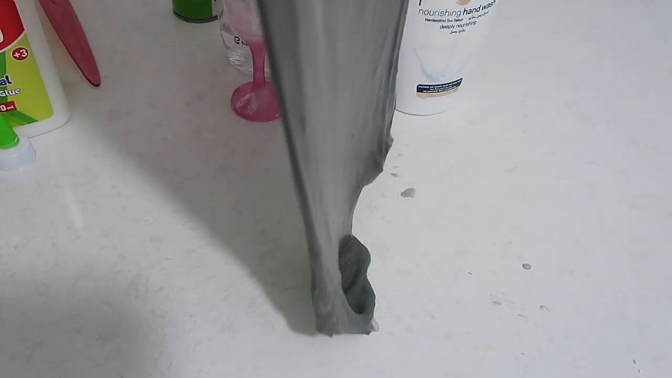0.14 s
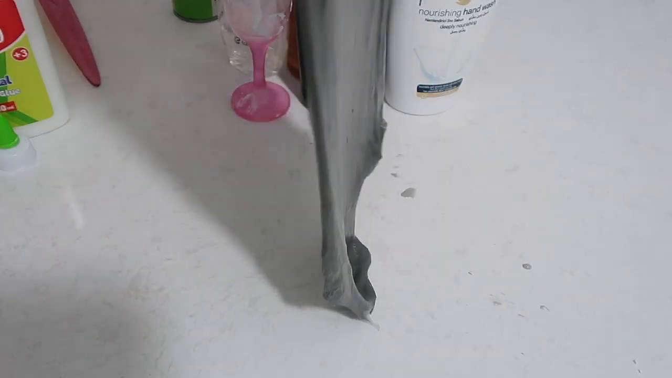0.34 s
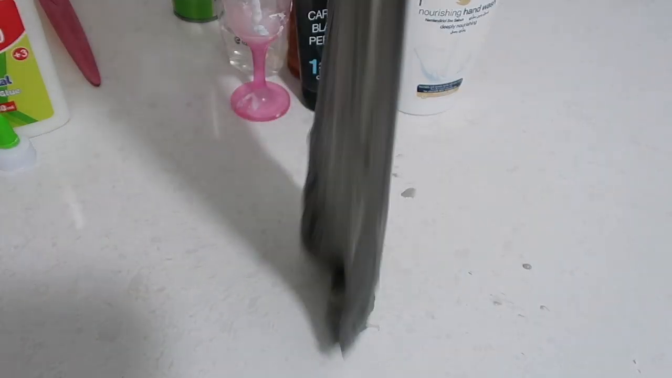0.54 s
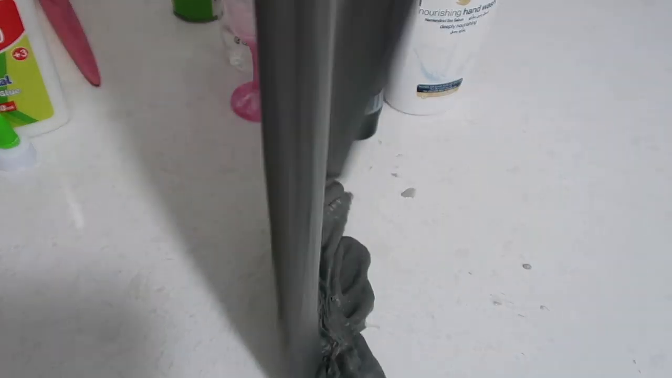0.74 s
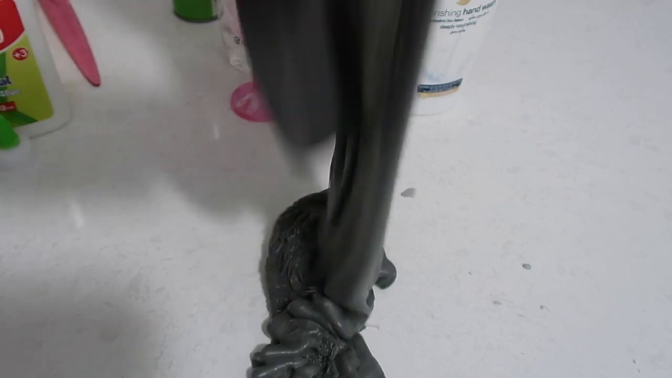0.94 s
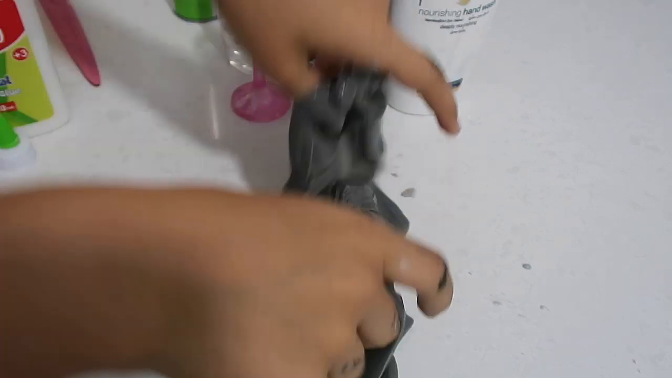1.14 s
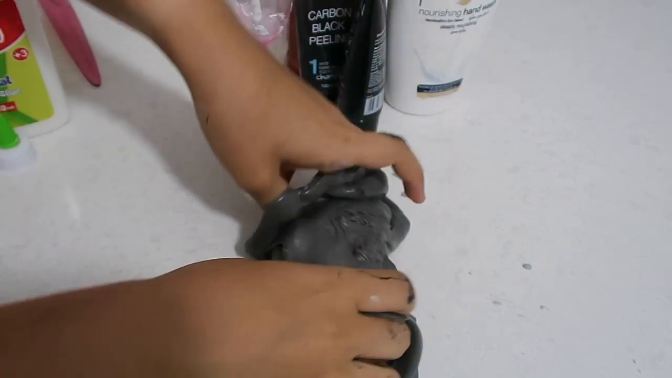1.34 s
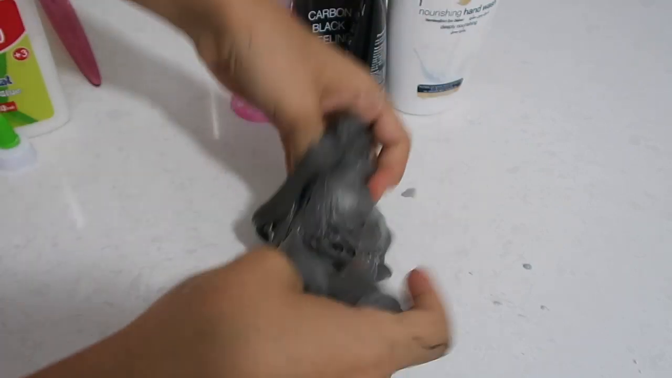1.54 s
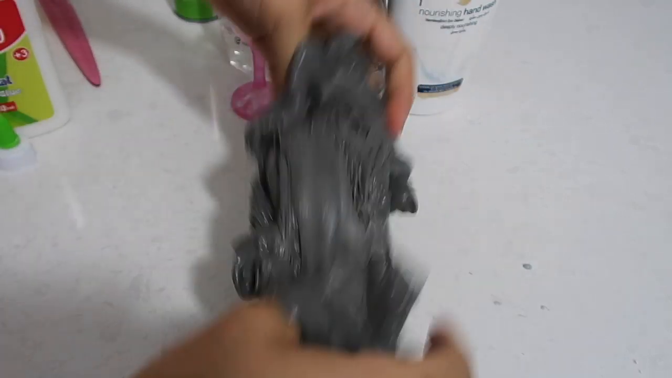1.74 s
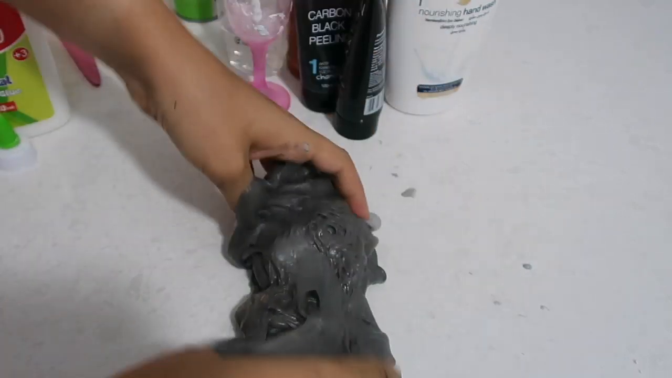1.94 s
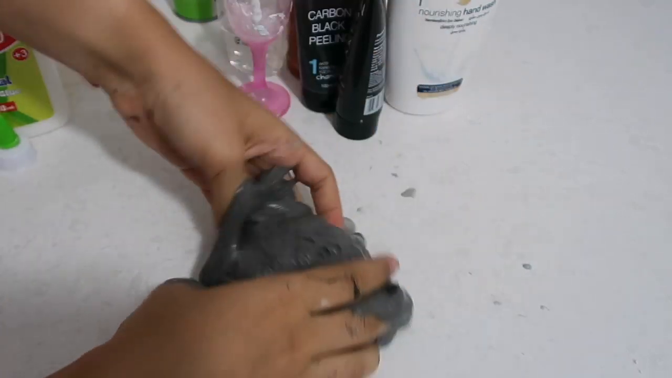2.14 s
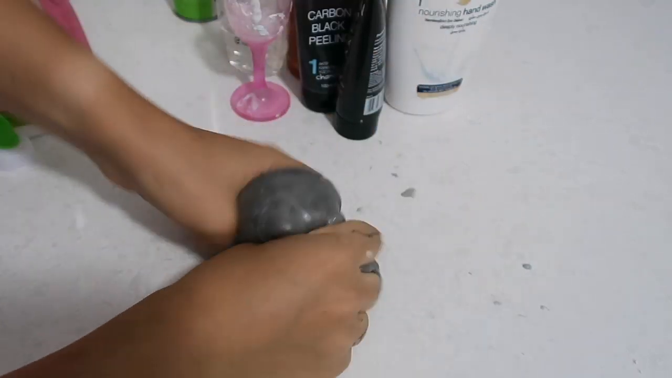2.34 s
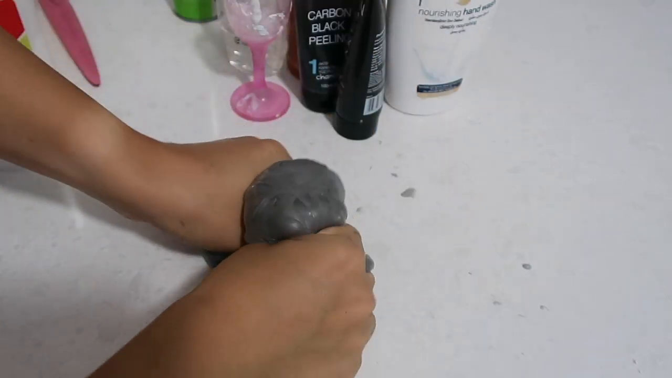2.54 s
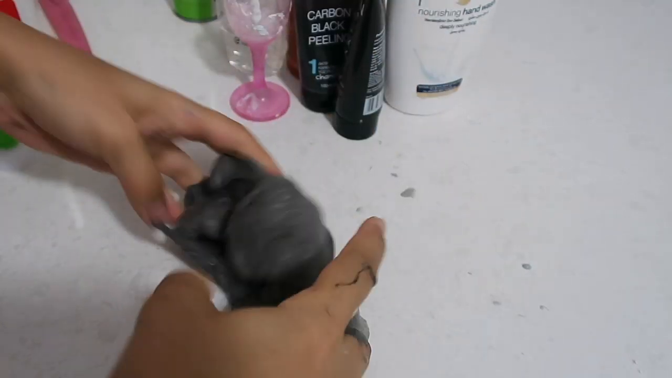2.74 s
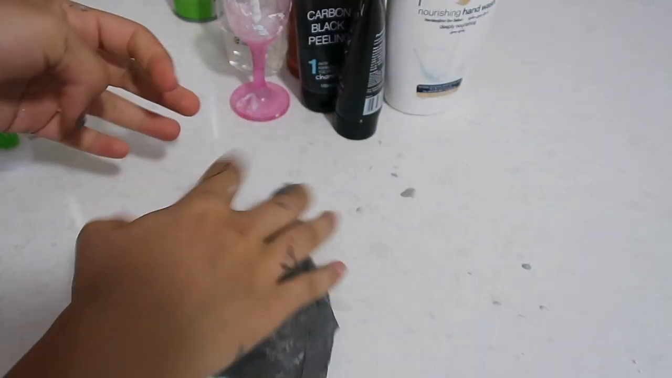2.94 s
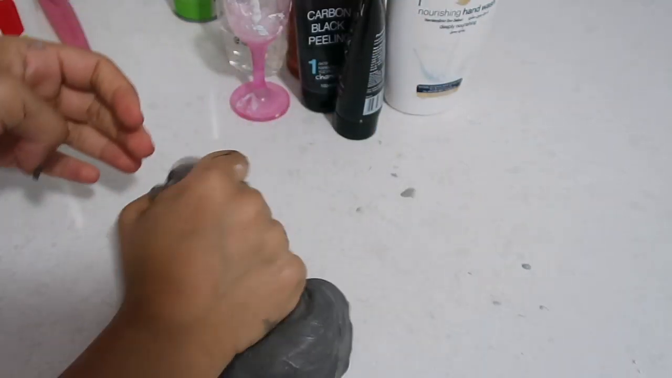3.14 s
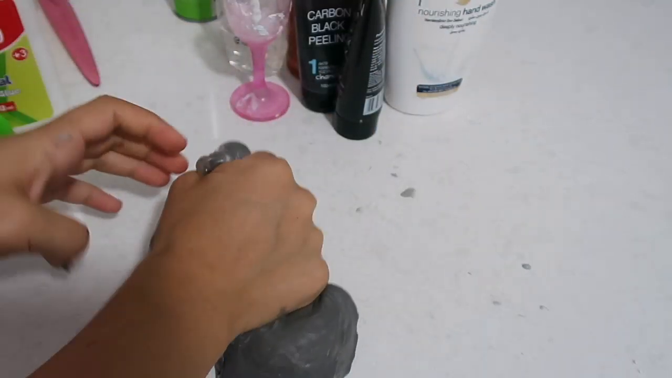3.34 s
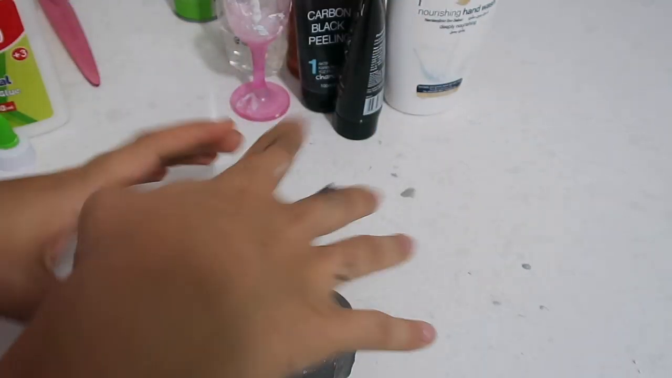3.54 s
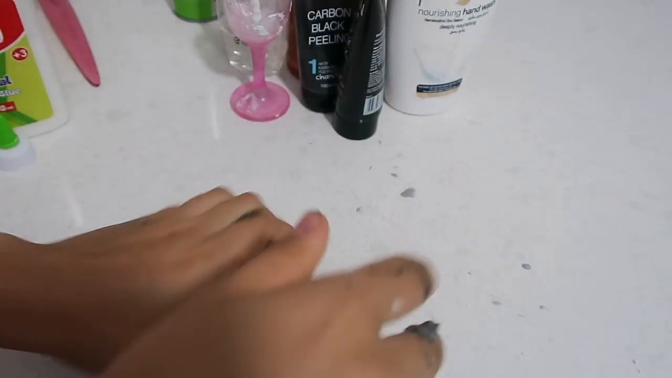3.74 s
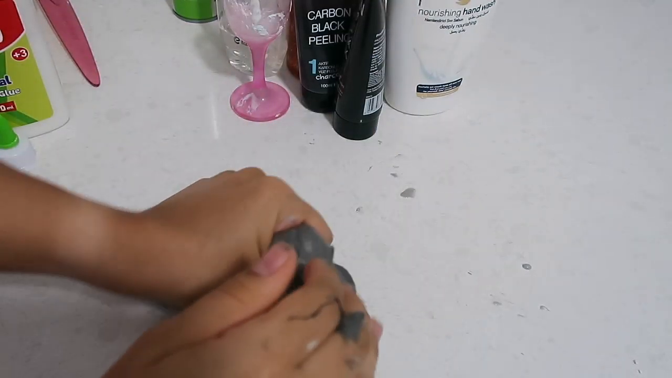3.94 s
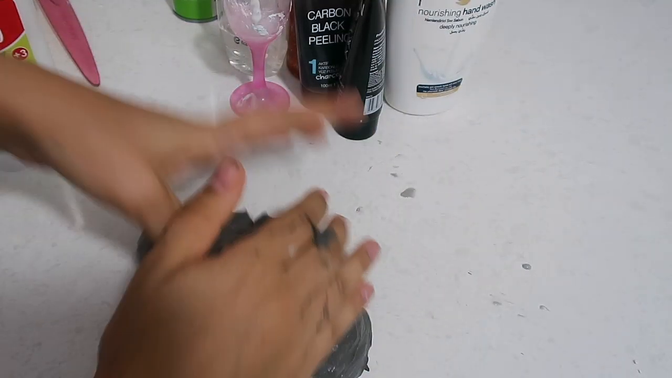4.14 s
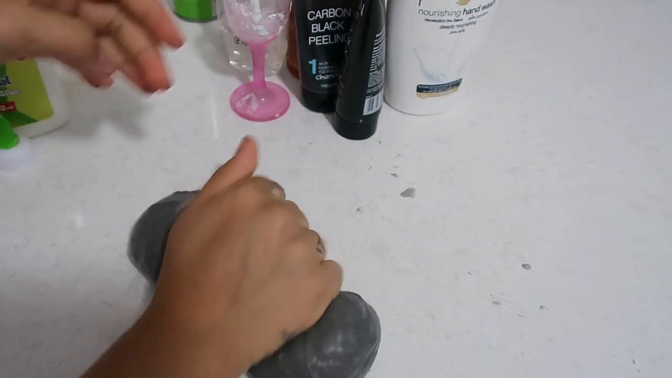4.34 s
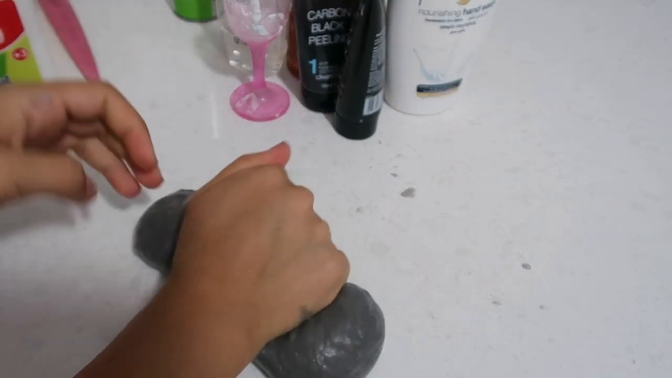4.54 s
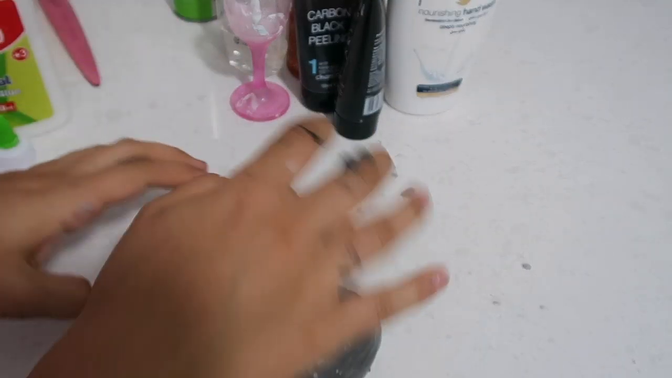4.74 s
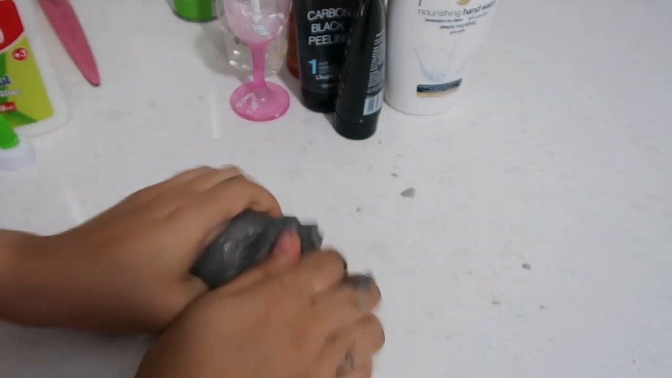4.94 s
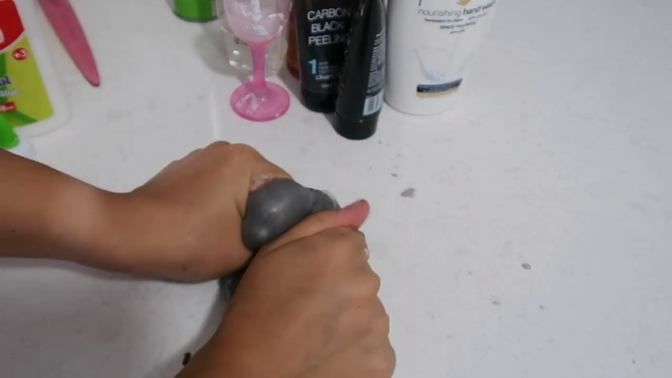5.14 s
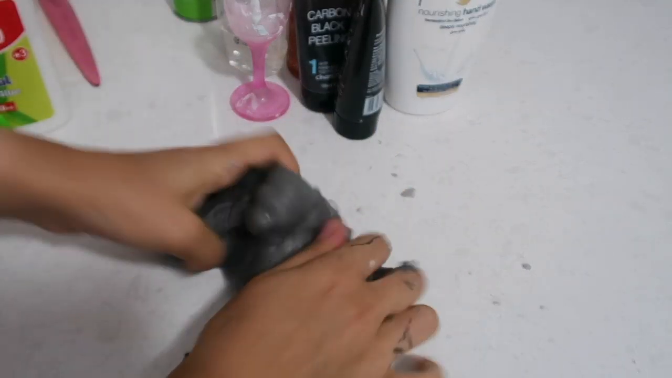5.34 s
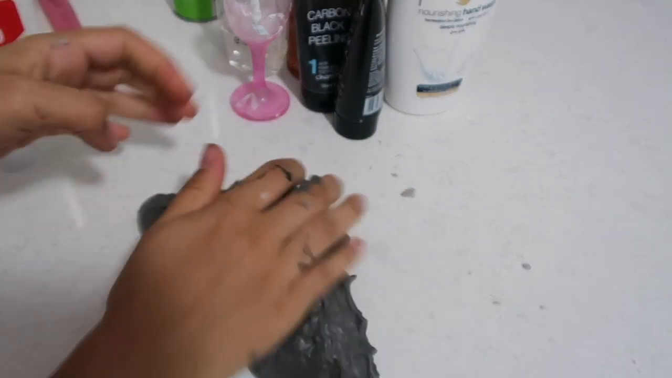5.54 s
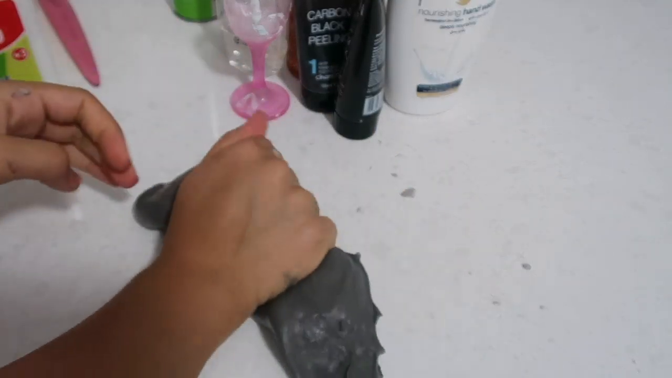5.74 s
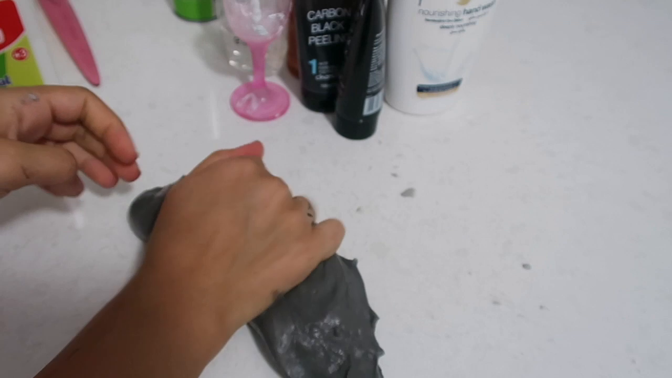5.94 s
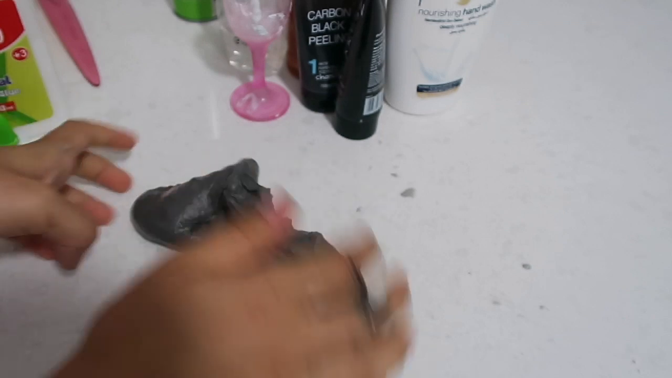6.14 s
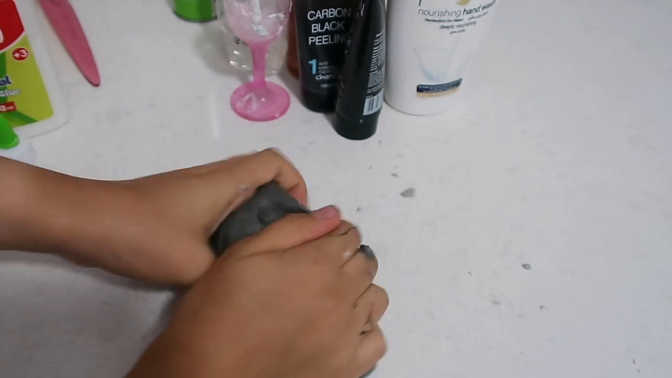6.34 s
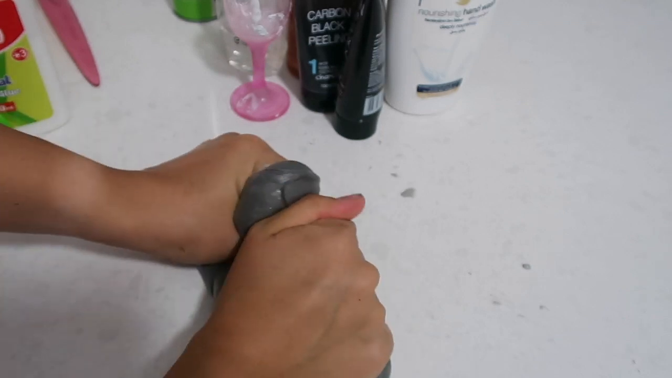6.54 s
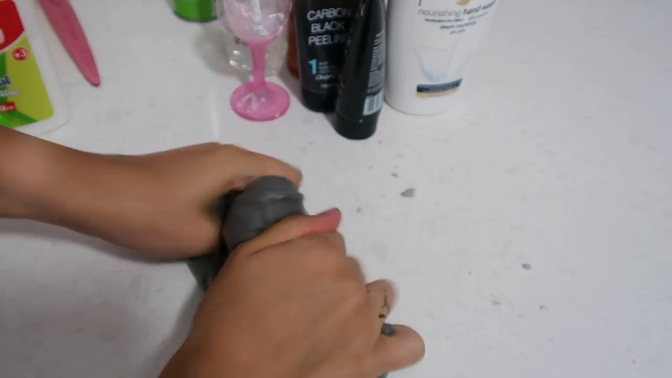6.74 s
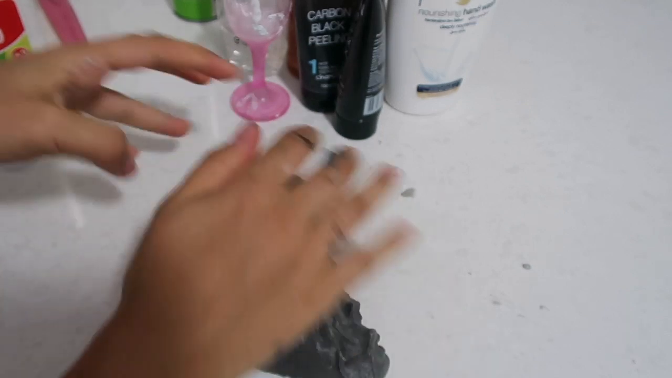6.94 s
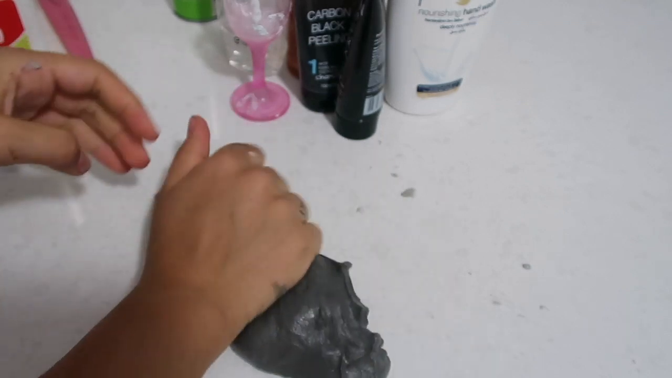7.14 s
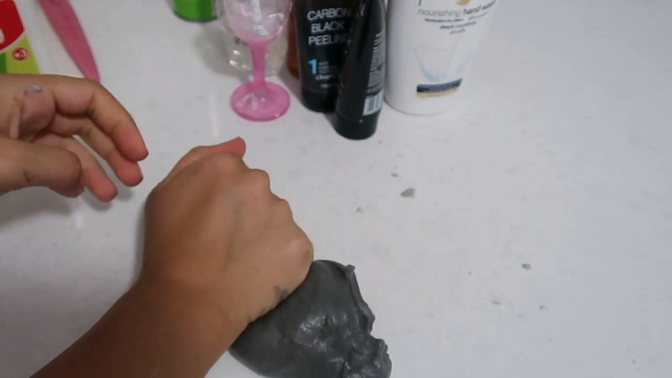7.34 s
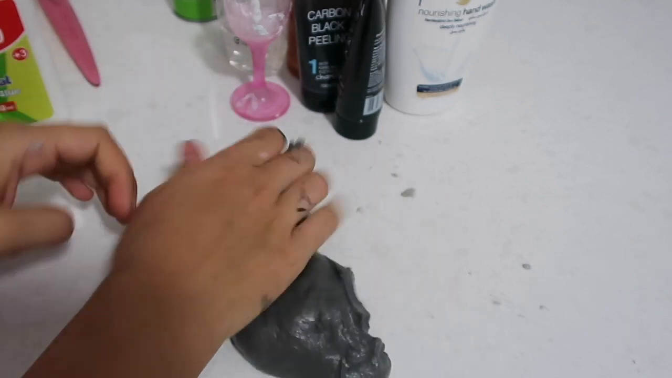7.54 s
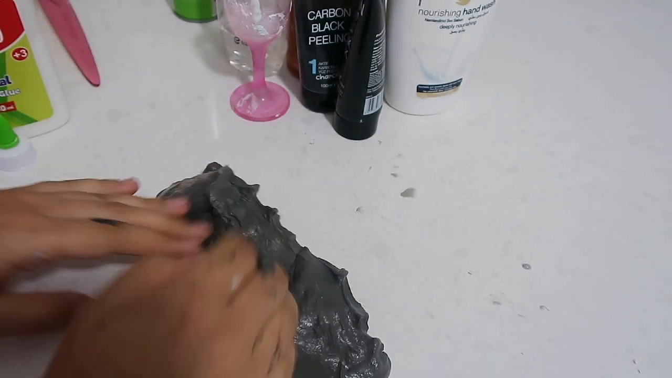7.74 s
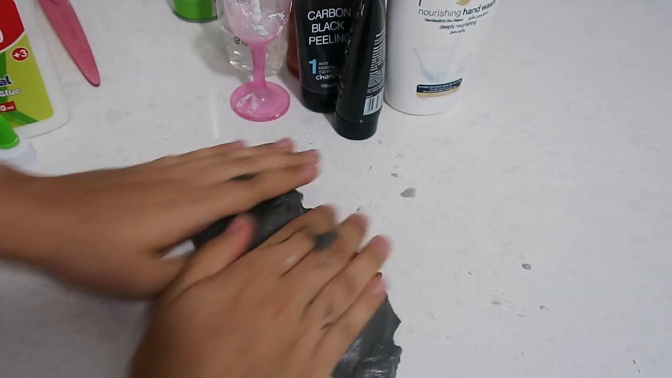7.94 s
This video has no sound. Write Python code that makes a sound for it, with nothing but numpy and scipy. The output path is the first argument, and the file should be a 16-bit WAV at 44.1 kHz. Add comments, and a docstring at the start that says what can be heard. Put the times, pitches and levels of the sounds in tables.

```python
"""A low room hum, a thin hiss and a faint insect, perhaps a cricket, are heard first: shaped noise and a rasping tone.
Slime then stretches with a rustle of damped grains, a passing hand puffs air on the microphones, and the lump slaps a table.
Hands squeeze and fold it close by: squeezes crackle as trains of small bursts, and air pockets snap and plop as damped
resonators. Folds squelch, large cavities glug on rising notes and pinholes squeak, all in a small, hard-walled room."""
import sys
import numpy as np
from scipy import signal
from scipy.fft import rfft, irfft, next_fast_len
from scipy.io import wavfile
from scipy.ndimage import map_coordinates

SR = 44100
rng = np.random.default_rng(int(sys.argv[2]) if len(sys.argv) > 2 else 0)


def dump(signal):
    """Clip the signal to [-1, 1] and save it as 16-bit WAV at the path in sys.argv[1]."""
    limited = np.clip(np.atleast_2d(signal).T, -1, 1)
    pcm = np.round(limited * 32767).astype(np.int16)
    wavfile.write(sys.argv[1], SR, pcm)


N = 356769
TIME = np.arange(N) / SR
SHORT = 2048  # samples in one short burst
SHORT_HZ = np.fft.rfftfreq(SHORT, 1 / SR)


def amp(db):
    """Level law: decibels to amplitude gain."""
    return 10 ** (np.asarray(db) / 20)


def unit(x):
    """Power normalisation: scale to rms 1."""
    return x / np.sqrt(np.mean(x ** 2) + 1e-20)


def along(points, hz):
    """Spectral interpolation: read (frequency [Hz], value) points on a logarithmic frequency axis."""
    f, v = np.transpose(points)
    return np.interp(np.log(hz + 1), np.log(f + 1), v)


def wobble(rate):
    """Slow random modulation: a smooth curve through rate random knots a second."""
    knots = rng.standard_normal(int(N * rate / SR) + 4)
    return map_coordinates(knots, [TIME * rate])


def filtered(x, response):
    """Linear filtering: multiply the spectrum of x by a response of frequency."""
    n = x.shape[-1]
    m = next_fast_len(n + SR // 4)
    return irfft(rfft(x, m) * response(np.fft.rfftfreq(m, 1 / SR)), m)[..., :n]


def resonance(f, hz, q):
    """Damped simple resonator: a causal band-pass response."""
    return 1j * f * hz / q / (hz * hz - f * f + 1j * f * hz / q)


def delay(f, ms):
    """Propagation delay: a phase that is linear in frequency."""
    return np.exp(-2j * np.pi * f * ms / 10 ** 3)


def add(track, s, sound):
    """Superposition: mix a sound into a track at s seconds."""
    part = track[max(round(s * SR), 0):][:len(sound)]
    part += sound[:len(part)]


def ring(hz, q):
    """Damped impulse response: a resonance of peak 1, its edge rounded by the soft slime; Q is at least 0.3."""
    ratio = SHORT_HZ / hz
    rounding = 1 + .6j * ratio - (ratio / 2.3) ** 2
    pulse = irfft(resonance(SHORT_HZ, hz, max(q, .3)) / rounding)
    return pulse / np.abs(pulse).max()


def grains(length, hz, rate, q, scatter, spread_db, swell_db):
    """Granular emission: many weak and a few strong bursts of random pitch; the level climbs swell_db (falls if negative)."""
    out = np.zeros(round(length * SR) + SHORT)
    count = max(int(length * rate), 2)
    when, chance, pitch, push = rng.random((count, 4)).T
    sizes = (np.argsort(np.argsort(chance)) + .5) / count  # ranks spread evenly over 0-1
    for k in range(count):
        grain_hz = hz * np.exp(scatter * (2 * pitch[k] - 1))
        polarity = np.sign(push[k] - .5)
        burst = polarity * amp(spread_db * sizes[k] ** 3) * ring(grain_hz, q)
        add(out, length * (k + when[k]) / count, burst)
    progress = np.minimum(np.arange(len(out)) / (length * SR), 1)
    rms = np.sqrt(np.sum(out ** 2) / (length * SR))
    return out / rms * amp(swell_db * (progress - 1))


# likeness of diffuse sound at the two microphones: (frequency [Hz], left-right correlation [0-1])
DIFFUSE_LIKENESS = [(100, 0.99), (1000, 0.88), (2000, 0.73), (4000, 0.3), (8000, 0), (14000, 0)]


def diffuse(noise):
    """Spatial coherence: two unrelated noises as two close microphones hear them, alike in the bass only."""
    def mid_and_side(f):
        turn = np.arccos(np.clip(along(DIFFUSE_LIKENESS, f), -1, 1)) / 2
        return np.array([np.cos(turn), np.sin(turn)])
    mid, side = filtered(noise, mid_and_side)
    return np.array([mid + side, mid - side])


# shape of the hum spectrum: (frequency [Hz], relative density [dB per Hz])
HUM_SPECTRUM = [(15, -43), (25, -17), (54, 1), (101, -2.5), (149, -0.5), (222, -1.5), (297, 0), (366, -7),
                (389, 0), (499, -1.5), (641, -10), (711, -5.5), (875, -10), (2010, -20.5), (3600, -34),
                (4680, -92), (7920, -120)]
# narrow resonances in the hum: (frequency [Hz], width of each of two passes [Hz], rms level before the waver [dB])
HUM_RESONANCES = [(158.4, 9.4, -59), (302.8, 6.1, -57.5), (520, 93, -60), (561, 21, -60), (969, 24, -63.5)]
# shape of the hiss spectrum: (frequency [Hz], relative density [dB per Hz])
HISS_SPECTRUM = [(1500, 0), (3500, 5), (5200, 0.5), (8000, -4.5), (11000, -9.5), (16000, -25)]


def background(hum_db, hiss_db, waver_db):
    """Shaped noise: a fan-like hum of slightly wavering level with a few narrow resonances, under a thin hiss."""
    def bed(response):
        return unit(filtered(diffuse(rng.standard_normal((2, N))), response))
    hum = amp(hum_db) * bed(lambda f: amp(along(HUM_SPECTRUM, f)))
    for hz, width, db in HUM_RESONANCES:
        hum = hum + amp(db) * bed(lambda f: resonance(f, hz, hz / width) ** 2)
    hiss = amp(hiss_db) * bed(lambda f: amp(along(HISS_SPECTRUM, f)))
    return hum * amp(waver_db * wobble(6.2)) + hiss


# phrases of the insect: (start [s], end [s], rms level before the fades [dB], choppiness [0-1], pitch [Hz])
INSECT_PHRASES = [(-0.15, 0.52, -60.5, 0.84, 4190), (.45, 0.857, -62, 1, 4220),
                  (0.76, 1.134, -62, 0.5, 4250), (1.02, 1.4, -65, 0.4, 4300), (2.114, 3.13, -62, 0.6, 4280),
                  (3.296, 3.95, -59.5, 0.7, 4280), (4.102, 4.44, -61.5, 0.7, 4270),
                  (4.702, 5.106, -63.5, .95, 4200), (5.998, 6.484, -64, 0.9, 4280),
                  (6.798, 7.19, -66, 0.64, 4330), (7.66, 8.121, -63, 0.4, 4270)]
TRILL_FADE_S = 0.11  # a phrase swells and fades over this time


def trill(rasp_ratio, rasp_db, strokes_per_s):
    """Stridulation: a wing resonates on one note, in a smooth trill or in separate strokes that also rasp higher up."""
    waver_hz = 85 * wobble(900)
    flutter = amp(3 * wobble(40) + 2 * wobble(9))
    drift = .25 * wobble(18) + 1.5 * wobble(1.5)  # uneven timing [strokes]
    strokes = np.maximum(np.sin(2 * np.pi * (strokes_per_s * TIME + drift)), 0) ** 2
    out = np.zeros(N)
    for start, end, db, chop, hz in INSECT_PHRASES:
        at = slice(max(round(start * SR), 0), round(end * SR))
        phase = 2 * np.pi * np.cumsum(hz + waver_hz[at]) / SR
        wing = np.sin(phase)
        rasp = amp(rasp_db) * np.sin(rasp_ratio * phase)
        phrase = ((1 - chop) * wing + chop * strokes[at] * (wing + rasp)) * flutter[at]
        to_edge = np.minimum(TIME[at] - start, end - TIME[at])
        fade = np.clip(to_edge / TRILL_FADE_S, 0, 1)
        add(out, start, amp(db) * unit(phrase) * fade)
    return out


# strands peel apart as the slime is pulled: (start [s], end [s], relative level [dB])
STRAND_PULLS = [(0.719, 0.919, -61), (0.799, 1.222, -63.5), (1.43, 1.519, -59), (1.541, 1.741, -62.5),
                (1.812, 1.892, -60)]


def stretching(hz):
    """Superposed fractures: many fine strands part in a soft rustle that swells and fades with the pull."""
    out = np.zeros(N)
    for start, end, db in STRAND_PULLS:
        rustle = grains(end - start, hz, rate=650, q=2.2, scatter=0.85, spread_db=19, swell_db=-10)
        add(out, start, amp(db) * rustle * signal.windows.hann(len(rustle)))
    return out


# puffs of air on the microphones: (centre time [s], peak level [dB], swing rate [Hz])
AIR_PUFFS = [(1.185, -24, 68), (1.245, -29.5, 55), (1.30, -33.5, 42)]


def puffs():
    """Aerodynamic pressure: slow swings under a bell-shaped envelope as a hand sweeps past the microphones."""
    out = np.zeros(N)
    for s, db, hz in AIR_PUFFS:
        cycles = (TIME - s) * hz
        out += amp(db) * np.cos(2 * np.pi * cycles) * np.exp(-2 * cycles ** 2)
    return out


# air pockets that burst, levels before the common trims: (time [s], snap level [dB], snap pitch [Hz], snap Q,
# plop level [dB], plop pitch [Hz], snap muffled above [Hz])
BURSTING_POCKETS = [(1.9034, -24, 1620, 0.3, -38, 750, 9000),
                    (1.9076, -25, 1600.0, 1.2, -38, 900.0, 9000.0),
                    (1.9345, -4.5, 2360, 2.15, -22, 600, 6950), (1.937, -1.5, 4500, 2, -9, 537, 8600),
                    (2.343, -20, 1420.0, 0.65, -25.5, 467, 12500),
                    (2.3609, -29, 1810.0, 1.2, -26.5, 310, 16100),
                    (2.3823, -25, 2340, 2.7, -33, 340.0, 9500.0),
                    (2.4482, -12, 2280.0, 0.33, -21.5, 526, 8700.0),
                    (2.4811, -9, 2150.0, 0.28, -17, 690, 16300.0),
                    (2.489, -7, 2250.0, 0.3, -21, 1000, 19900.0), (2.494, 6, 3960, 1.5, -25.5, 390, 8500),
                    (2.581, -8.5, 3130.0, 0.76, -19, 666, 19900.0),
                    (2.7354, -30, 2960, 0.67, -27, 1110, 12100), (2.762, -22.5, 1010, 2.8, -37, 450, 6000),
                    (3.075, -28, 1900, 0.41, -29.5, 590, 13900.0),
                    (3.1706, -26.0, 1900, 0.22, -23.5, 517, 7500.0),
                    (3.205, -19.5, 5660.0, 2, -30.0, 500.0, 8300.0),
                    (3.2179, -19, 2700.0, 0.4, -19, 425, 19900.0),
                    (3.227, -18, 1630, 2.2, -23, 830, 19900.0), (3.243, -11, 3180, 0.23, -19, 680, 19900.0),
                    (3.314, -2, 1850, 0.36, -7.5, 537, 10300), (3.881, -22.5, 2880.0, 2.9, -24, 473, 12000),
                    (3.895, -15.5, 1530, 3.1, -18, 268, 5000), (3.8955, -20, 780, 2.5, -38, 300, 4000),
                    (3.9102, 4, 2940, 0.61, -16.5, 514, 4380), (3.951, -13, 7000.0, 0.55, -22, 403, 12700),
                    (4.1738, -25, 1850, 0.99, -20.5, 660, 12000), (4.45, -17.5, 2300, 1.3, -24, 403, 3300),
                    (4.4564, -25, 1370, 0.38, -24, 430.0, 16300.0),
                    (4.505, -11.5, 4160, 0.25, -26, 593, 18600.0),
                    (4.531, -19, 1890.0, 2.2, -25, 670.0, 4800.0),
                    (4.5804, -20.5, 920, 1.3, -35, 302, 14000.0),
                    (4.5886, -4.5, 2900, 0.25, -17, 745, 19900.0),
                    (4.591, 2, 3720, 0.25, -13.5, 543, 19900), (5.032, -31, 4500, 0.44, -31, 453, 15900),
                    (5.0707, -18.5, 1780, 0.26, -39, 375, 19500.0),
                    (5.077, -21, 1540.0, 1.9, -26, 610.0, 17900.0),
                    (5.086, -21, 3870.0, 4.1, -35.0, 390.0, 8700.0),
                    (5.114, -17, 3130.0, 2.5, -35, 560.0, 4700.0),
                    (5.1286, -14, 1600, 0.8, -17, 830.0, 9000), (5.1365, -5, 2800, 0.68, -18, 417, 17900),
                    (5.141, -15, 1490, 0.6, -24, 400, 9000), (5.173, -3.5, 6550, 1.4, -38, 380.0, 9700.0),
                    (5.1781, -3, 2030, 0.54, -14, 650, 19900), (5.189, 0.5, 3650, 0.54, -11, 694, 16000),
                    (5.1927, 4.5, 3640, 0.81, -12.5, 480, 15200),
                    (5.2136, -3.5, 4800, 0.44, -21, 750, 15400), (5.232, -6.5, 4140, 0.83, -23, 593, 16000),
                    (5.2482, 3.5, 5750, 0.87, -21.5, 1320, 8150), (5.417, -23, 1990, 0.53, -25, 500, 8000),
                    (5.715, -29.5, 2320, 1.2, -57, 500.0, 9000.0),
                    (5.7607, -17.5, 1820, 0.24, -21.5, 720, 16000),
                    (5.819, -24, 1800.0, 1.0, -40, 500.0, 6000.0),
                    (5.825, 0.5, 2670, 0.76, -9.5, 430, 16500), (5.856, -1.5, 8000, 0.52, -27, 420, 14800),
                    (5.993, -20, 2940.0, 0.3, -47, 590.0, 19900.0),
                    (6.067, -25.5, 1830, 1.56, -36, 450.0, 4000.0),
                    (6.4619, -22, 2610.0, 0.27, -32, 610.0, 19500),
                    (6.492, -14, 3500.0, 0.26, -29.5, 620.0, 10300.0),
                    (6.547, -9.5, 4130.0, 0.28, -34, 790.0, 17900.0),
                    (6.569, -36, 1500.0, 1.0, -31, 500.0, 6000.0),
                    (6.5927, -23, 1520.0, 0.68, -20, 660.0, 19900.0),
                    (6.6032, -10, 4090.0, 0.3, -49, 400.0, 19900.0),
                    (6.6081, 5, 4570, 0.43, -23, 330, 10900), (6.62, 5.5, 4880, 2.2, -15.5, 885, 9150),
                    (6.7167, 0, 4500, 0.2, -28, 726, 19900.0), (6.8552, -22.5, 3400, 1.5, -40, 1200, 8000),
                    (7.2207, -10, 3560.0, 0.32, -20.5, 560.0, 6800.0),
                    (7.228, -4, 3960, 0.57, -18.5, 627, 7860),
                    (7.2352, 2.0, 5200.0, 1.3, -23.5, 380.0, 5200),
                    (7.3543, 2.5, 7900, 1.45, -23, 695, 10600), (7.4078, 4, 2230, 0.94, -10, 584, 10400),
                    (7.5946, -25, 3100, 2.9, -35, 1100, 6000)]


def pops(plop_q, snap_db, plop_db, bounce_ms):
    """Cavity resonance: each skin snaps and the opened cavity rings briefly; returns bursts and their table reflections."""
    out, bounced = np.zeros((2, N))
    heights = rng.standard_normal(len(BURSTING_POCKETS))
    for (s, db, hz, q, cavity_db, cavity_hz, cover_hz), height in zip(BURSTING_POCKETS, heights):
        ratio = SHORT_HZ / cover_hz
        cover = (1 + np.sqrt(2) * 1j * ratio - ratio ** 2) ** 2  # a buried pocket loses its treble
        snap = irfft(rfft(ring(hz, q)) / cover)
        plop = ring(cavity_hz, plop_q)
        burst = amp(db + snap_db) * snap + amp(cavity_db + plop_db) * plop
        add(out, s, burst)
        extra_path_ms = bounce_ms * np.exp(0.14 * height)  # a higher pocket bounces later
        add(bounced, s + extra_path_ms / 10 ** 3, burst)
    return out, bounced


# resonances of the lump: (frequency [Hz], Q, relative peak level [dB])
LUMP_RESONANCES = [(170, 1.8, -14), (433, 4.4, -8.5), (930, 2.7, -7.5)]
LANDING_S = 1.9352  # the lump slaps down on the table
SPLAT_S, SPLAT_DB, SPLAT_HZ = 0.0021, -16.5, 3330  # half-duration, level before the mix, dull above
LANDING_ROOM_DB, SPLAT_ROOM_DB = -3, -7  # how much of the thud and of the splat reaches the room


def landing():
    """Impact excitation: skin splats bit by bit as the mass lands with a short thud; returns direct sound and room feed."""
    thud, crack = np.zeros((2, N))
    for k, (hz, q, db) in enumerate(LUMP_RESONANCES):
        add(thud, LANDING_S, (-1) ** k * amp(db) * ring(hz, q))
    contact = np.exp(-((TIME - LANDING_S - SPLAT_S / 2) / SPLAT_S) ** 4)
    dull_noise = filtered(rng.standard_normal(N), lambda f: 1 / (1 + 1j * f / SPLAT_HZ) ** 2)
    splat = amp(SPLAT_DB) * contact * unit(dull_noise)
    # heard from all sides at once, the splat evens out to one broad crack of equal energy
    add(crack, LANDING_S, ring(SPLAT_HZ, 1.0))
    crack *= np.linalg.norm(splat) / np.linalg.norm(crack)
    return thud + splat, amp(LANDING_ROOM_DB) * thud + amp(SPLAT_ROOM_DB) * crack


# the fist closes on the lump, about every 0.7 s: (start [s], end [s], relative level at the end [dB],
# crackle pitch [Hz], squelch over crackle [dB])
FIST_SQUEEZES = [(2.335, 2.499, -48, 2470, 3.5), (3.192, 3.311, -41, 2660, -0.5),
                 (3.896, 3.973, -34.5, 2440, -4), (4.442, 4.592, -41.5, 2290, 1.5),
                 (5.064, 5.216, -36.5, 2770, -2.5), (5.695, 5.817, -57, 1510, -18),
                 (6.449, 6.63, -44.5, 2700, -3.5), (7.224, 7.408, -42, 3330, -8.5)]
SQUELCH_HZ = 396  # centre pitch of wet creases
GRIP_S = 0.0057  # the fingers take this long to grip


def kneading():
    """Bubble-size scaling: small bubbles crackle high under the fingers while larger creases squelch low."""
    out = np.zeros(N)
    for start, end, db, crackle_hz, squelch_db in FIST_SQUEEZES:
        length = end - start
        crackle = grains(length, crackle_hz, rate=260, q=1.3, scatter=0.88, spread_db=7, swell_db=4.5)
        squelch = grains(length, SQUELCH_HZ, rate=150, q=3.4, scatter=0.48, spread_db=23.5, swell_db=2)
        grip = np.minimum(np.arange(len(crackle)) / SR / GRIP_S, 1)
        add(out, start, amp(db) * grip * (crackle + amp(squelch_db) * squelch))
    return out


# large cavities open or close: (time [s], relative note level [dB], pitch at its peak [Hz], cycles to its peak,
# tick over note [dB], tick pitch [Hz])
CAVITY_GLUGS = [(2.7235, -18, 375, 0.51, -7, 1100), (2.7307, -23.5, 425, .6, 4, 3200),
                (3.519, -14.5, 367, 0.66, -8, 1300), (3.5208, -21, 298, 0.65, 3.5, 2700),
                (4.132, -27, 390, 0.55, -1, 2600), (4.1461, -20.5, 341, 0.66, -11, 2000),
                (4.1618, -19, 457, 0.89, -10, 1810), (4.373, -26, 322, .5, -8, 850),
                (4.386, -23.5, 232, 0.43, -12, 890), (4.393, -36, 520, 0.45, -6, 900),
                (4.398, -33, 600, 0.54, -7, 1050), (4.4015, -25, 400, 0.52, -31, 990),
                (4.408, -29, 430, .5, -21, 1100), (4.42, -27, 270, 0.48, -15, 1000),
                (4.427, -31.5, 250, 0.56, -15, 900), (4.439, -30, 230, 0.48, -16, 1200),
                (4.714, -28.5, 370, 0.81, -10, 1490), (5.4032, -27, 410, 0.66, -10, 1500),
                (6.113, -34, 377, 0.43, -3, 2600), (6.8493, -32, 333, 0.54, -7, 1296),
                (6.8545, -18.5, 353, 0.4, 0.5, 950), (7.1997, -29, 280, 0.42, -3, 2000),
                (7.264, -29, 285, .55, -12, 2600), (7.308, -26, 413, 0.38, -5, 2000),
                (7.593, -23, 270, 0.47, -2, 2100), (7.714, -34, 298, 0.72, -25, 1500)]
GLUG_GLIDE = 0.039  # the note rises by this share each cycle as the cavity shrinks


def glugs(tick_q):
    """Shrinking-cavity resonance: a large soft cavity gives a low, rising wet note, and its sticky rim a small tick."""
    out = np.zeros(N)
    for s, db, hz, peak_cycles, tick_db, tick_hz in CAVITY_GLUGS:
        cycles = np.arange(SHORT) / SR * hz
        age = cycles / peak_cycles
        envelope = age * np.exp(1 - age)
        glide = 1 + GLUG_GLIDE * (cycles / 2 - peak_cycles)
        note = envelope * np.sin(2 * np.pi * cycles * glide)
        add(out, s, amp(db) * (note + amp(tick_db) * ring(tick_hz, tick_q)))
    return out


# a flap of slime is pressed shut: (start [s], length [s], relative squelch level [dB], squelch pitch [Hz],
# crackle over squelch [dB])
FLAP_FOLDS = [(2.725, .07, -35.5, 435, -5), (3.515, .06, -31.5, 333, -7), (4.154, 0.073, -39.5, 410, -4.5),
              (4.389, .016, -33, 870, -22), (4.405, 0.059, -38, 294, -19), (4.697, 0.053, -39, 410, -1),
              (5.414, .05, -39.5, 416, -3.5), (6.06, 0.068, -54, 342, 4), (6.848, .03, -36, 620, -10),
              (7.594, 0.06, -49.5, 288, -0.5)]
LEAD_SHARE = 0.05  # part of a fold that passes before the air flows fastest


def folding(skin_ratio):
    """Flow-driven bubbles: air squelches and crackles out from under a flap as it is pressed shut."""
    out = np.zeros(N)
    for s, length, db, hz, crackle_db in FLAP_FOLDS:
        squelch = grains(length, hz, rate=200, q=1.7, scatter=0.67, spread_db=8, swell_db=1)
        crackle = grains(length, skin_ratio * hz, rate=500, q=0.9, scatter=1.0, spread_db=11, swell_db=-2.5)
        progress = np.arange(len(squelch)) / SR / length
        flow = np.interp(progress, [0, LEAD_SHARE, 1], [.25, 1, .3])
        add(out, s, amp(db) * flow * (squelch + amp(crackle_db) * crackle))
    return out


# air squeaks out through a pinhole: (start [s], length [s], relative level [dB], pitch [Hz])
PINHOLE_SQUEAKS = [(4.451, .04, -50, 2300), (6.843, 0.0086, -43, 3260)]
SQUEAK_WAVER_HZ = 150  # how far the pitch trembles


def squeaks():
    """Flow-induced oscillation: the rim of a pinhole flutters on one trembling note while air escapes."""
    out, waver = np.zeros(N), SQUEAK_WAVER_HZ * wobble(400)
    for s, length, db, hz in PINHOLE_SQUEAKS:
        pitch = hz + waver[round(s * SR):][:round(length * SR)]
        tone = np.sin(2 * np.pi * np.cumsum(pitch) / SR)
        add(out, s, amp(db) * unit(tone * signal.windows.tukey(len(pitch), .5)))
    return out


def near(x, lead_ms):
    """Interchannel time difference: the direct sound reaches the left microphone first."""
    return filtered(x, lambda f: np.array([delay(f, -lead_ms / 2), delay(f, lead_ms / 2)]))


# time for the echoes to die by 60 dB: (frequency [Hz], decay time [s])
DECAY_TIMES = [(150, 0.47), (400, 0.3), (1000, 0.58), (2800, 0.56), (7000, 0.46), (14000, 0.2)]


def room_tail(wall_ms, build_s, merge_s):
    """Reverberant decay: single echoes, strongest early, merge into a tail with its own decay time at each frequency."""
    age = np.arange(3 * SR // 4) / SR
    density = np.clip((age / merge_s) ** 2, .1, 1)  # echoes crowd in with the square of time
    present = rng.random(len(age)) < density
    echoes = present / np.sqrt(density) * rng.standard_normal((2, len(age)))
    early_boost = 1 + 6.8 * np.exp(-age / build_s)
    echoes *= np.where(age < wall_ms / 10 ** 3, .35, early_boost)  # little returns before the wall does
    hz, t, z = signal.stft(echoes, SR, nperseg=256)
    decay = amp(-60 * t / along(DECAY_TIMES, hz)[:, None])
    tail = signal.istft(z * decay, SR, nperseg=256)[1]
    return tail / np.linalg.norm(tail, axis=1, keepdims=True)


# tone colour of the room: (frequency [Hz], relative level [dB])
ROOM_TONE = [(60, -13), (200, -4.5), (450, -16.5), (700, -8), (950, -0.5), (1450, -0.5), (2100, -2),
             (5000, -2), (9000, 4), (15000, 8)]
# standing waves of the room: (frequency [Hz], width [Hz], lift [dB])
STANDING_WAVES = [(253.6, 28, 11), (419.4, 25.4, 15.5), (543, 35, 12.5), (1040, 310, 1.5)]


def room(x, tail_db, wall_db, wall_ms):
    """Reflection and reverberation: a near wall and the whole room answer; echoes change each half second as hands move."""
    wet, step = np.zeros((2, N)), SR // 2
    for i in range(0, N, step):
        tail = room_tail(wall_ms, build_s=0.004, merge_s=.08)
        answer = signal.fftconvolve(x[None, i:i + step], tail, axes=1)
        for ear, sound in zip(wet, answer):
            add(ear, i / SR, sound)

    def colour(f):
        lifts = [1 + (amp(db) - 1) * resonance(f, hz, hz / width) for hz, width, db in STANDING_WAVES]
        return amp(along(ROOM_TONE, f)) * np.prod(lifts, axis=0)
    wet = filtered(diffuse(wet), colour)
    wall = filtered(x, lambda f: delay(f, wall_ms) / (1 + 1j * f / 6000))
    return amp(tail_db) * wet + amp(wall_db) * wall


PALM_HZ = 6000  # the hand covers the small sounds and muffles them above this
BOUNCE_HZ = 9000  # a pop's bounce off the sticky table is dull above this


def scene():
    """Superposition of fields: the slime a little left of centre, its room, the puffs and the still background."""
    still = background(hum_db=-47.5, hiss_db=-59.0, waver_db=-0.77)
    still = still + trill(rasp_ratio=1.2, rasp_db=-10.0, strokes_per_s=52)

    def thin(x):  # small pockets radiate little bass
        return filtered(x, lambda f: 1j * f / (120 + 1j * f))
    bursts, bounced = pops(plop_q=1.8, snap_db=-0.57, plop_db=-1.0, bounce_ms=0.764)
    slap, slap_spread = landing()
    handling = stretching(hz=2000) + kneading() + glugs(tick_q=1.54) + folding(skin_ratio=5.94) + squeaks()
    covered = filtered(handling, lambda f: 1 / (1 + 1.2j * f / PALM_HZ - (f / PALM_HZ) ** 2))
    slime = thin(bursts + covered)
    bounced = filtered(thin(bounced), lambda f: 1 / (1 + 1j * f / BOUNCE_HZ))
    direct = near(slime + slap + 0.86 * bounced, lead_ms=0.022)
    heard = direct + room(slime + slap_spread, tail_db=-1.0, wall_db=-16, wall_ms=6.9)
    # the slime is a little louder in the left channel, the puffs a little louder in the right
    return heard * amp([[.55], [-.55]]) + still + puffs() * amp([[-1], [1]])


TOP_HZ = 16000  # band limit


def record(dry):
    """Saturation and band limiting: the highest peaks round off, and almost nothing above the band limit remains."""
    clipped = dry / (1 + np.abs(dry) ** 8) ** (1 / 8)
    return filtered(clipped, lambda f: 1 / np.sqrt(1 + (f / TOP_HZ) ** 240))


dry = scene()
out = record(dry)
dump(out)
```